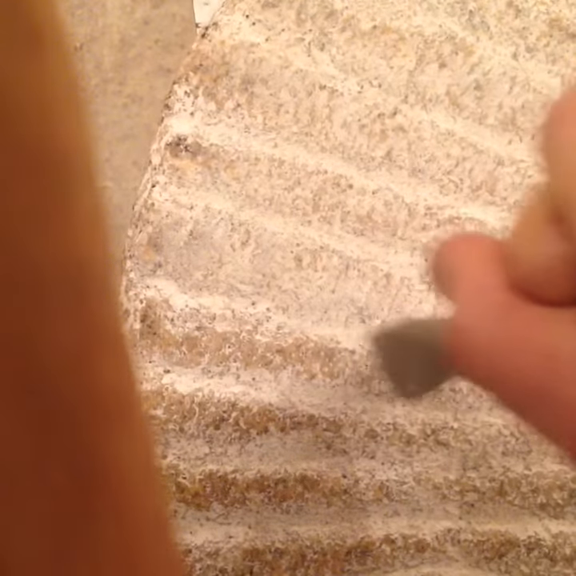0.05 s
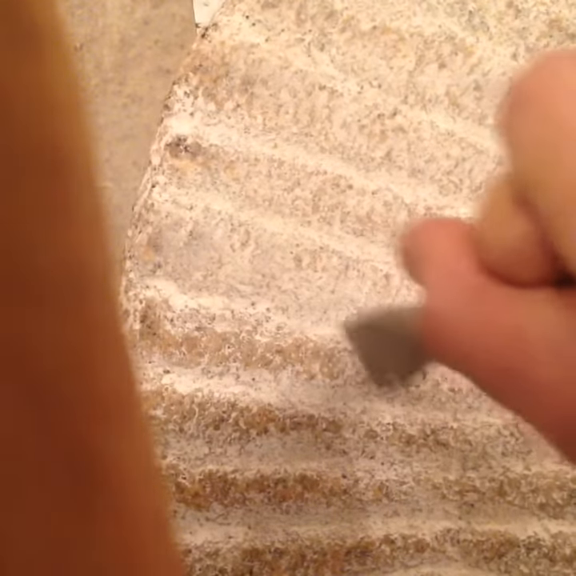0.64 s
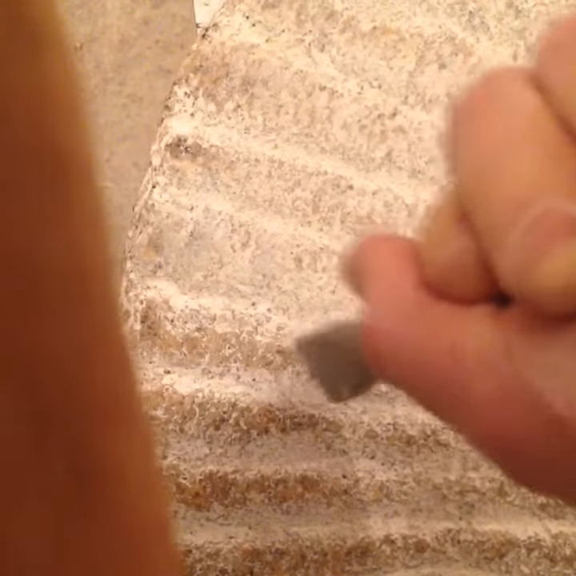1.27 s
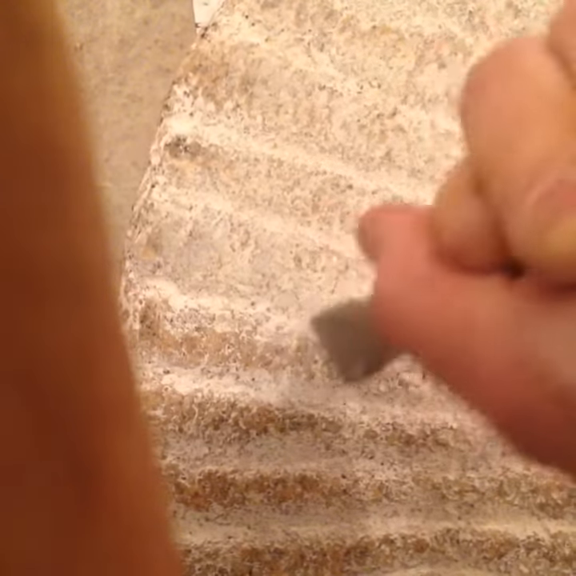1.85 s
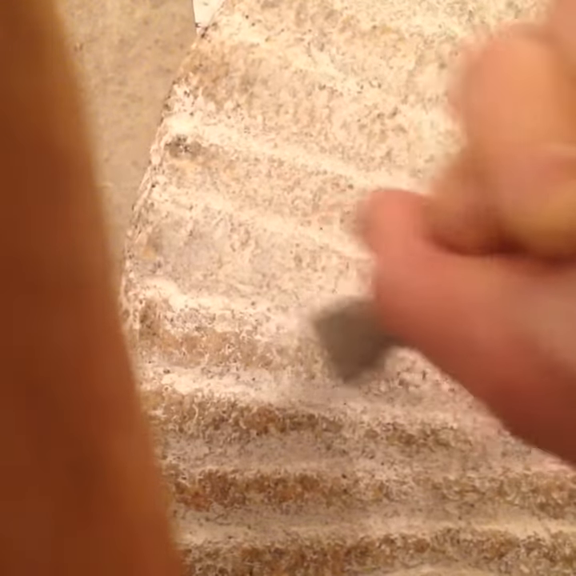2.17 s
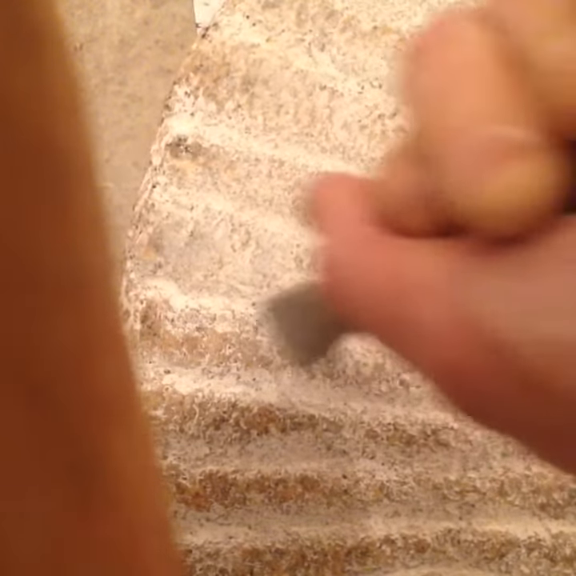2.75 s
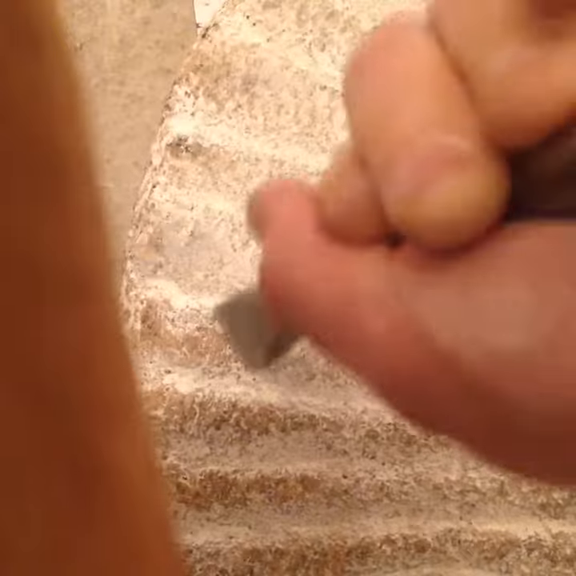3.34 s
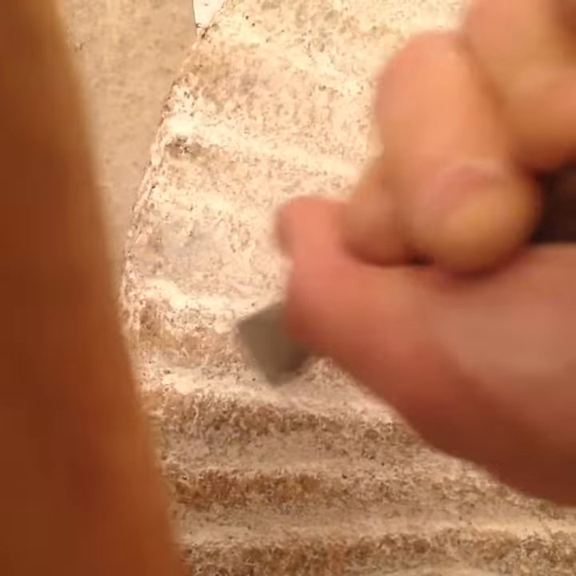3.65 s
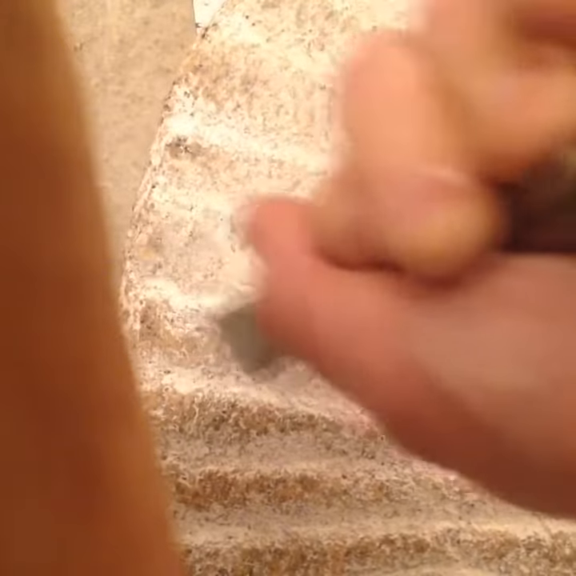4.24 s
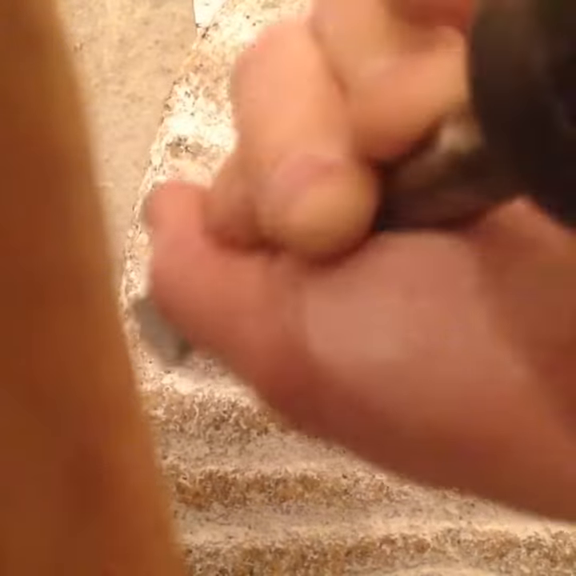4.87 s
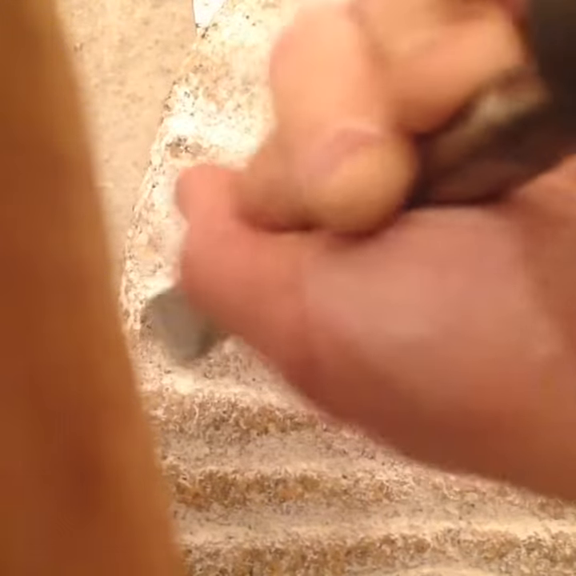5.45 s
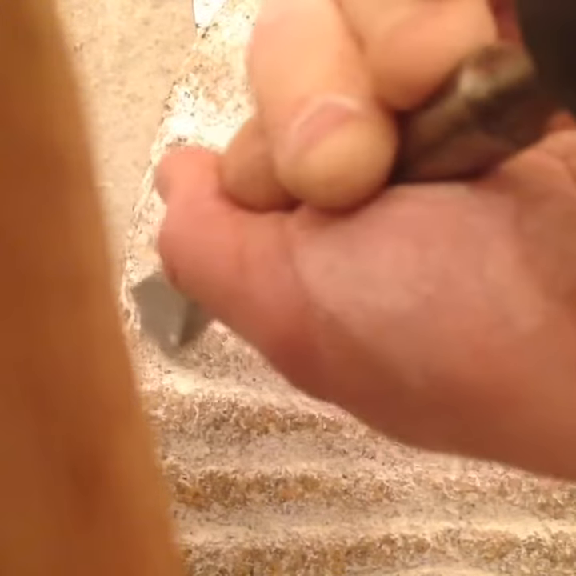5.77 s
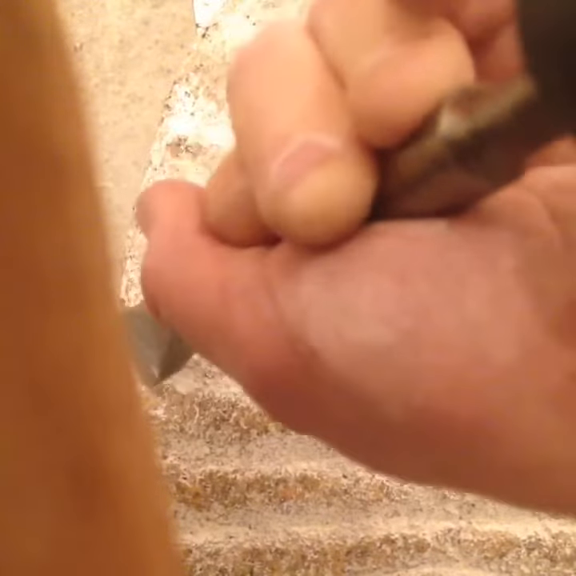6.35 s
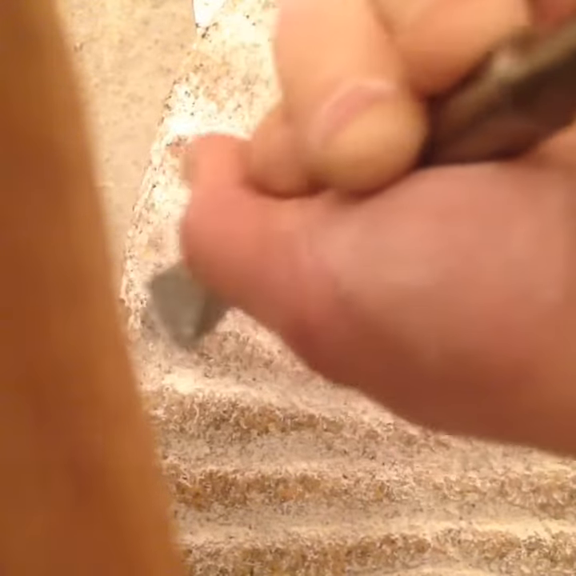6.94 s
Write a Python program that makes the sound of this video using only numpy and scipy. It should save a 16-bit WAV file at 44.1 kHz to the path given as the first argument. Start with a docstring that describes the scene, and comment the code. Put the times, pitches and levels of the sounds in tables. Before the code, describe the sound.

Close by in a small workshop, a hand-held air hammer drives a steel chisel along a millstone. The very fast blows merge into a rattling buzz, with knocking stone, crunching grit, a thin metallic ring and pulsing air. Late on, the tool hisses and drones more, then the pressure eases and the chisel pecks unevenly. A faint hum and rumble lie underneath.

```python
"""A small workshop, close by: a hand-held air hammer drives a chisel along the furrows of a millstone.
The piston strikes about 40 times a second with a clack: the stone knocks, its grains crunch and chip
under the edge, the steel rings. Between blows the chisel rattles and the piston returns with a puff of
air. Late on the barrel comes close, droning and hissing; then the hand eases off and the chisel pecks.
A faint hum and rumble lie underneath."""
import sys
import numpy as np
from scipy import signal
from scipy.fft import rfft, irfft
from scipy.io import wavfile
from scipy.ndimage import uniform_filter1d

SR = 44100
rng = np.random.default_rng(int(sys.argv[2]) if len(sys.argv) > 2 else 0)


def waveform_to_disk(signal):
    """Save audio, clipped to [-1, 1], as 16-bit WAV at the path in sys.argv[1]."""
    frames = np.transpose(np.atleast_2d(signal))
    scaled = np.clip(frames, -1, 1) * 32767
    samples = np.round(scaled).astype(np.int16)
    wavfile.write(sys.argv[1], SR, samples)


N = 313110
TIME = np.arange(N) / SR
RETURN_S = .0182   # blow to piston return
ROCK_PER_S, SHIFT_PER_S = 9.9, 40   # edge rocks in the furrow; contact shifts
BEND_HZ, TIP_HZ = 1863, 12436   # strongest shank and tip modes


def from_db(db):
    """Decibels to gain."""
    return 10 ** (np.asarray(db) / 20)


def unit_rms(x):
    """Scale to unit rms."""
    return x / np.sqrt(np.mean(x ** 2) + 1e-20)


def chance(shape, low=-2, high=2):
    """Clipped normal draws."""
    return np.clip(rng.standard_normal(shape), low, high)


def drift(per_s):
    """Random curve, spread about 1."""
    return np.interp(TIME * per_s, np.arange(512), chance(512))


def in_time(rows):
    """Each column of a time table at every sample."""
    s, *columns = np.transpose(rows)
    return [np.interp(TIME, s, c) for c in columns]


def at_hz(points, hz):
    """Interpolate on a log-frequency axis."""
    f, value = np.transpose(points)
    return np.interp(np.log(hz + 1e-3), np.log(f), value)


def colour(x, spectrum, size=8192):
    """Minimum-phase filter, rolling off below the spectrum's first point."""
    hz = np.fft.rfftfreq(size, 1 / SR)
    gain = from_db(at_hz(spectrum, hz)) * np.clip(hz / spectrum[0][0], 1e-2, 1)
    cepstrum = irfft(np.log(gain))
    cepstrum[1:size // 2] *= 2
    cepstrum[size // 2 + 1:] = 0
    return signal.fftconvolve(x, irfft(np.exp(rfft(cepstrum))))[:N]


def bandpass(x, low_hz, high_hz):
    """Butterworth band-pass."""
    return signal.sosfilt(signal.butter(2, [low_hz, high_hz], "band", fs=SR, output="sos"), x)


def clicks(times, sizes):
    """One impulse at each time."""
    inside = (times >= 0) & (times < (N - 1) / SR)
    return np.bincount(np.round(times[inside] * SR).astype(int), sizes[inside], N)


def swell(hits, rise_s, fall_s):
    """Rise-and-decay envelope after each impulse."""
    t = np.arange(2048) / SR
    return np.abs(signal.fftconvolve(hits, (1 - np.exp(-t / rise_s)) * np.exp(-t / fall_s))[:N])


def ring(x, hz, t60_s):
    """One decaying mode; its pitch may move."""
    turn = np.exp(2j * np.pi * np.cumsum(hz * np.ones(N)) / SR)
    pole = from_db(-60 / (t60_s * SR))
    return np.imag(turn * signal.lfilter([1], [1, -pole], x / turn + 1e-18))


def grainy_noise(spread_db):
    """Noise with a random gain on every sample."""
    return unit_rms(rng.standard_normal(N) * from_db(spread_db * chance(N)))


def bursts(times, spread_db, rise_s, fall_s):
    """Noise bursts of random strength."""
    sizes = from_db(spread_db * chance(len(times), high=1))
    return unit_rms(swell(clicks(times, sizes), rise_s, fall_s) * rng.standard_normal(N))


def clatter(times, sizes, spectrum, fall_s, shade_db):
    """Noise bursts of random colour; low bands last longer."""
    edges_hz = [80, 620, 1050, 1450, 2050, 3100, 4400, 6600, 10000, 13200, 20000]
    out = 0
    for low, high in zip(edges_hz, edges_hz[1:]):
        shade = from_db(shade_db * chance(len(times), -1.7, 1.7))
        power = swell(clicks(times, (sizes * shade) ** 2), .0001, fall_s * (1500 / high) ** .15)
        out = out + bandpass(unit_rms(np.sqrt(power)) * rng.standard_normal(N), low, high)
    return unit_rms(colour(out, spectrum))


# piston speed: (time [s], rate [blows/s])
BLOW_RATE = [(0.0, 39.295), (0.5, 39.613), (2.4, 39.578), (2.8, 39.758), (4.0, 39.715), (4.8, 39.974),
             (6.0, 39.562), (6.25, 39.611), (6.45, 38.309), (7.1, 38.706)]


def piston_cycles():
    """Running cycle count; the piston is steady under load and sags as the hand eases off."""
    return np.cumsum(in_time(BLOW_RATE)[0]) / SR


# deep bites and late uneven blows, relative: (time [s], crunch [dB], knock [dB], splinter [dB])
ACCENTS = [(0.006, 5.5, -7.0, -8.0), (0.158, 3.5, -3.5, -1.5), (0.184, 6.0, -7.0, 0.0),
           (0.26, 4.0, -1.5, -1.0), (0.285, 3.5, -0.5, -3.0), (0.588, 5.0, -7.0, -2.5),
           (0.664, 4.5, -3.5, -1.5), (0.689, 3.5, 2.0, -2.5), (0.79, 4.5, -7.0, -3.0),
           (0.891, 8.0, -7.0, -3.0), (0.917, 2.5, -1.5, 0.5), (1.245, 0.5, 4.5, 3.0),
           (1.321, 4.5, 4.0, -2.5), (1.346, 1.5, -2.0, 5.0), (1.371, 2.5, 3.5, 2.5),
           (1.422, 5.0, 2.0, -8.0), (1.447, 7.0, -7.0, -2.5), (1.573, 2.0, 1.0, 0.0),
           (1.674, 3.0, -1.5, -1.0), (1.775, 7.0, -7.0, -0.5), (1.8, 3.5, -3.0, 0.5),
           (1.901, 4.5, -7.0, -7.5), (2.028, 3.5, 2.0, -3.0), (2.205, 3.0, 3.0, -1.0),
           (2.331, 4.0, -7.0, -1.0), (2.457, 2.5, 4.5, -3.5), (2.659, 6.0, 0.0, -2.5),
           (2.81, 2.5, 1.0, 4.5), (2.911, 3.0, 4.0, -2.0), (3.036, 5.5, -7.0, -2.5),
           (3.137, 4.0, -7.0, -1.5), (3.238, 6.0, 2.0, -4.0), (3.464, 0.5, 2.0, 3.0),
           (3.489, 4.0, -1.0, -3.5), (3.565, 4.0, 4.0, 2.0), (3.842, 2.0, 0.0, 1.5),
           (3.942, 2.5, -2.5, 3.5), (3.968, 4.0, 2.5, 0.5), (3.993, 6.5, 3.0, -2.5),
           (4.043, -1.5, 3.0, 7.0), (4.32, 0.5, 4.0, 1.5), (4.395, 4.5, -1.0, -2.0), (4.42, 3.0, 1.5, -1.5),
           (4.546, 1.5, 1.5, 0.0), (4.746, 4.0, -4.0, -3.0), (4.771, 0.0, 2.5, 5.5),
           (4.921, 2.0, -1.0, 0.0), (4.971, 5.5, -7.0, -5.0), (4.996, 8.0, -2.5, -7.0),
           (5.021, 5.0, -4.0, -0.5), (5.398, 5.0, 2.5, -4.5), (5.448, 1.5, 0.5, 1.0),
           (5.473, 2.5, 2.5, -2.0), (5.624, 3.5, 0.5, -4.0), (5.801, 0.0, 3.0, 4.5),
           (5.978, 4.0, 0.5, -3.0), (6.054, 6.0, -2.0, -6.0), (6.104, 2.5, 4.0, 2.0),
           (6.155, 1.0, 3.5, 3.5), (6.205, 4.0, -2.5, -3.5), (6.357, -0.5, 1.0, -2.5),
           (6.383, 2.5, -2.5, -1.5), (6.409, -4.5, -0.5, 5.5), (6.435, -4.5, -6.0, 4.0),
           (6.461, -3.0, -3.5, -3.0), (6.487, -7.5, -3.0, 4.0), (6.513, 4.0, -7.0, -8.0),
           (6.539, 1.0, -7.0, -7.5), (6.565, 1.5, -7.0, -8.0), (6.591, 3.5, -0.5, -7.0),
           (6.617, -3.0, 3.5, 7.0), (6.643, -7.5, -7.0, 2.5), (6.669, 3.0, -7.0, -8.0),
           (6.695, -7.0, -2.5, 1.0), (6.721, -3.0, 0.0, 1.0), (6.747, -3.5, 3.0, 7.0),
           (6.773, -1.0, 1.5, 2.0), (6.799, 0.0, 2.0, -1.0), (6.825, -7.0, -1.0, 6.0),
           (6.851, 2.5, 0.5, 2.0), (6.877, 2.5, 4.0, 7.0), (6.903, -5.0, 0.5, 4.0),
           (6.929, 0.5, -5.5, -0.5), (6.955, -2.5, 1.5, -3.0), (6.981, -0.5, 0.0, 1.5),
           (7.007, 0.0, -1.5, 1.0), (7.033, -1.0, 2.0, -5.5), (7.059, -4.5, -0.5, 7.0)]


def piston(first_s=.0057, jitter_s=.00014):
    """Blow times with crunch, knock and splinter gains, random except at the accents."""
    cycles = piston_cycles()
    times = np.interp(np.arange(int(cycles[-1]) + 1), cycles, TIME) + first_s
    scatter = chance((len(times), 4), -2.2, 1.2)
    usual_db, spread_db = np.array([-1, -.4, 0]), np.array([2.6, 1.6, 3.2])
    db = usual_db + spread_db * scatter[:, :3]
    for s, *accent_db in ACCENTS:
        db[np.argmin(np.abs(times - s))] = accent_db
    return times + jitter_s * scatter[:, 3], *from_db(db.T)


# piston on steel: (frequency [Hz], gain [dB])
STRIKE_SPECTRUM = [(220, -11), (600, -7.5), (900, -3), (1200, -2.5), (1600, 0), (2300, -9), (3000, -14),
                   (3900, -17), (4900, -18), (6000, -23), (7900, -24), (10000, -34), (12500, -26),
                   (15000, -26)]


def strike(times, sizes, lead_s=.0006):
    """Piston meets steel: a hard clack just ahead of the crunch."""
    hits = clicks(times - lead_s, sizes)
    scuff = unit_rms(swell(hits, rise_s=.0001, fall_s=.001) * rng.standard_normal(N))
    return unit_rms(colour(unit_rms(hits) + 1.8 * scuff, STRIKE_SPECTRUM))


# tool and stone body: (frequency [Hz], gain [dB])
KNOCK_SPECTRUM = [(200, -24), (400, -14), (520, -6), (555, -5.5), (620, -10), (675, -1.2), (715, -1),
                  (755, 1.7), (835, 1.6), (875, 2.2), (920, -1), (1020, -7), (1250, -20), (1700, -29),
                  (3000, -55)]


def knock(times, force, press, lead_s=.0006, return_db=-8):
    """Tool and stone answer every blow alike; the piston's return knocks more softly."""
    return_times = times + RETURN_S + .00021 * rng.standard_normal(len(times))
    blows = clicks(times - lead_s, force)
    returns = from_db(return_db) * press * clicks(return_times - lead_s, force)
    return unit_rms(colour(blows + returns, KNOCK_SPECTRUM))


def cracks(times, bite, press, count=5, lead_s=.0009):
    """Times and sizes of grain cracks; more pressure and a deeper bite prolong the breaking."""
    stretch = (.2 + .9 * np.interp(times, TIME, press)) * bite ** .25
    delay_s = rng.gamma(5, .00043, (len(times), count)) * stretch[:, None] - lead_s
    sizes = np.exp(-delay_s / .057)
    sizes *= bite[:, None] / np.linalg.norm(sizes, axis=1, keepdims=True)   # share the blow's energy
    return (times[:, None] + delay_s).ravel(), sizes.ravel()


# breaking grains: (frequency [Hz], gain [dB])
CRUNCH_SPECTRUM = [(100, -19), (250, -7), (480, -5.5), (780, 4), (1100, 0.5), (1600, 5), (2100, -7),
                   (2900, -1.5), (3300, -20), (4900, -13), (6800, -23.5), (10200, -35), (13000, -20),
                   (15200, -33)]


def crunch(crack_times, crack_sizes):
    """Grains break under the edge, one burst per crack."""
    return clatter(crack_times, crack_sizes, CRUNCH_SPECTRUM, fall_s=.0015, shade_db=3.8)


def splinter(x, times, gains, above_hz=2150):
    """Treble gain per blow: splitting hard grains is bright, crushing loose grit is dull."""
    treble = signal.sosfiltfilt(signal.butter(2, above_hz, "high", fs=SR, output="sos"), x)
    blow = np.clip(np.searchsorted(times, TIME + .003) - 1, 0, None)
    return x + (uniform_filter1d(gains[blow], size=64) - 1) * treble


# flat landings: (time [s], level [dB])
PECK_HITS = [(1.9044, -0.0), (6.3583, -0.1), (6.4363, -1.4), (6.4876, -5.6), (6.5142, -0.6), (6.54, -2.6),
             (6.5659, -2.2), (6.6702, -0.2), (6.7221, -1.6), (6.7995, -1.1), (6.9552, -2.4), (7.0337, -1.1)]
# one landing: (frequency [Hz], gain [dB])
PECK_SPECTRUM = [(400, -17), (900, -7), (1600, 0), (2200, -9), (3300, -25), (5000, -22), (9000, -36)]


def pecks(peak_db=.3, lead_s=.0006):
    """The bouncing chisel lands flat on the stone: short, dull knocks."""
    s, db = np.transpose(PECK_HITS)
    knocks = colour(clicks(s - lead_s, from_db(db)), PECK_SPECTRUM)
    return from_db(peak_db) * knocks / np.abs(knocks).max()


# chisel shank: (frequency [Hz], level [dB], t60 [s], wander [Hz])
SHANK_MODES = [(BEND_HZ, 0, 0.047, 8), (2930, -6, 0.016, 70), (7900, -20.5, 0.018, 110)]


def shank_ring(crack_times, crack_sizes, spread_db=4.5):
    """Each crack rings the steel's modes unequally; their pitch wanders as the contact shifts."""
    strengths = from_db(spread_db * chance((len(crack_times), len(SHANK_MODES)), high=1.5))
    out = 0
    for (hz, db, t60_s, wander_hz), strength in zip(SHANK_MODES, strengths.T):
        drive = clicks(crack_times, crack_sizes * strength)
        out = out + from_db(db) * unit_rms(ring(drive, hz + wander_hz * drift(SHIFT_PER_S), t60_s))
    return unit_rms(out)


# chisel tip: (frequency [Hz], level [dB], t60 [s], wander [Hz])
TIP_MODES = [(12150, -7, .014, 130), (TIP_HZ, 0, .04, 28), (12620, -6, .018, 120),
             (13400, -13.5, .012, 170)]


def tip_ring(times, bite, waver_db=.8):
    """Each blow taps and scrapes the tip's high modes; balance and pitch shift as the edge rocks."""
    taps = .28 * unit_rms(clicks(times - .0002, np.sqrt(bite)))
    out = 0
    for hz, db, t60_s, wander_hz in TIP_MODES:
        scrape = bursts(times - .0007, spread_db=2.1, rise_s=.0007, fall_s=.0021)
        gain = from_db(db + waver_db * drift(ROCK_PER_S))
        out = out + gain * unit_rms(ring(taps + scrape, hz + wander_hz * drift(SHIFT_PER_S), t60_s))
    return unit_rms(out)


# flying chips: (frequency [Hz], gain [dB])
CHIP_SPECTRUM = [(1200, -12), (2500, 2), (3300, -3), (4900, -2), (6200, -6), (7200, -15), (10000, -24),
                 (15000, -26)]


def chips(times, bite, count=4, spread_db=5):
    """Loosened grains snap off and skitter for some milliseconds after each blow."""
    delay_s = rng.gamma(3, .0023, (len(times), count))
    sizes = np.sqrt(bite)[:, None] * from_db(spread_db * chance(delay_s.shape, high=1.5))
    chip_times = times[:, None] + delay_s
    return clatter(chip_times.ravel(), sizes.ravel(), CHIP_SPECTRUM, fall_s=.0006, shade_db=4.5)


# steel on grit: (frequency [Hz], gain [dB])
GRATE_SPECTRUM = [(8000, -41.5), (11000, -18), (12400, -13), (13200, 9.5), (14200, -5), (15200, -20.5)]


def grate(times, waver_db=1.9):
    """The edge grates on broken grains, wavering as it rocks."""
    scrapes = bursts(times - .0004, spread_db=4.5, rise_s=.0012, fall_s=.0024)
    return from_db(waver_db * drift(ROCK_PER_S)) * unit_rms(colour(scrapes, GRATE_SPECTRUM))


# exhaust ports: (delay after blow [s], level [dB])
EXHAUST_PORTS = [(.0132, 0), (.0175, -1)]
# exhaust air: (frequency [Hz], gain [dB])
EXHAUST_SPECTRUM = [(150, -2.5), (400, 1.5), (830, 17), (1150, 6.5), (1600, 3.5), (2400, -11), (3300, -6),
                    (4000, -4.5), (4900, -2), (5500, -15), (6100, -3), (7200, -20), (9000, -20),
                    (15000, -22)]


def exhaust(times, press, open_s=.001, close_s=.0045, leak=.18, jitter_s=.00044, spread_db=2.1):
    """Air leaks all the time and swells as the returning piston uncovers each port."""
    blow = np.clip(np.searchsorted(times, TIME) - 1, 0, None)
    power = leak ** 2
    for port_s, port_db in EXHAUST_PORTS:
        timing, strength = chance((len(times), 2))[blow].T
        late_s = TIME - times[blow] - port_s - jitter_s * timing
        opening = np.exp(np.minimum(late_s / open_s, -late_s / close_s))
        power = power + (press * opening * from_db(port_db + spread_db * strength)) ** 2
    return unit_rms(colour(np.sqrt(power) * grainy_noise(spread_db=3), EXHAUST_SPECTRUM))


# chisel in its sleeve: (frequency [Hz], gain [dB])
RATTLE_SPECTRUM = [(200, -11), (500, -5), (800, -4), (1150, -5), (1600, -4.5), (2400, -5), (4000, -22)]


def rattle(times, count=12, pitches=14, spread_db=4):
    """The loose chisel chatters in its sleeve, most as the piston turns and just before it strikes."""
    delay_s = rng.uniform(.004, .025, (len(times), count))
    at_turn = .6 * np.exp(-((delay_s - RETURN_S) / .003) ** 2)
    before_blow = 1.1 * np.exp(-((delay_s - .0225) / .003) ** 2)
    sizes = (1 + at_turn + before_blow) * from_db(spread_db * chance(delay_s.shape, high=1.6))
    touch_times = times[:, None] + delay_s
    pitch = rng.integers(0, pitches, delay_s.shape)
    out = 0
    for k, hz in enumerate(np.geomspace(660, 2600, pitches)):
        touches = clicks(touch_times[pitch == k], sizes[pitch == k])
        out = out + np.sqrt(hz) * unit_rms(ring(touches, hz, t60_s=.011 * (3000 / hz) ** .4))
    return unit_rms(colour(out, RATTLE_SPECTRUM))


# air at the opening port: (frequency [Hz], gain [dB])
SPIT_SPECTRUM = [(400, 0.5), (1200, 10), (2400, 7), (3200, 1), (3900, 0), (4900, 2), (6100, -2.5),
                 (7200, -10), (7900, -4), (8600, -13), (10000, -20), (15000, -21.5)]


def port_spit(times, delay_s=.0164):
    """A sharp spit of air as the port opens."""
    spits = bursts(times + delay_s, spread_db=4.5, rise_s=.00035, fall_s=.0019)
    return unit_rms(colour(spits, SPIT_SPECTRUM))


# air leak at the shank: (frequency [Hz], gain [dB])
LEAK_SPECTRUM = [(3300, -7), (4900, 5), (6200, 3), (7200, -1), (8000, 5), (10000, -3), (12000, 2),
                 (15000, -10)]


def barrel(times, press, near_s=5.23, approach_s=.26):
    """The barrel comes close: it drones with both piston strokes, and blows spurt air past the shank."""
    nearness = .5 + .5 * np.tanh((TIME - near_s) / approach_s)
    strokes = 2 * piston_cycles()
    drone = from_db(-49) * np.sqrt(2 * press) * np.sin(2 * np.pi * strokes)
    spurts = swell(clicks(times - .0008, np.ones(len(times))), rise_s=.0003, fall_s=.0035)
    flow = unit_rms(1 + 2 * unit_rms(spurts))
    hiss = unit_rms(colour(grainy_noise(spread_db=6), LEAK_SPECTRUM))
    return nearness * (drone + from_db(-35.3) * press ** .25 * flow * hiss)


def flutter(times, force, roughness=.68):
    """The pulsing air adds a low, ragged burr."""
    # (frequency [Hz], gain [dB])
    spectrum = [(70, -18), (120, -24), (158, 2), (200, 2), (240, 3), (290, -13), (450, -15), (1000, -35)]
    pulses = unit_rms(clicks(times, force)) + roughness * rng.standard_normal(N)
    return unit_rms(colour(pulses, spectrum))


# workshop decay: (frequency [Hz], t60 [s])
ROOM_T60 = [(100, 1), (800, 0.97), (3000, 0.13), (12000, 0.15)]


def workshop(x, wet_db=-15.5, onset_s=.0035, size=16384):
    """A short diffuse tail whose treble dies first."""
    t = np.arange(size) / SR
    edges_hz = np.geomspace(70, 16000, 8)
    tail = 0
    for low, high in zip(edges_hz, edges_hz[1:]):
        t60_s = at_hz(ROOM_T60, np.sqrt(low * high))
        tail = tail + bandpass(rng.standard_normal(size), low, high) * from_db(-60 * t / t60_s)
    tail *= np.clip(t / onset_s, 0, 1)
    return from_db(wet_db) * signal.fftconvolve(x, tail / np.linalg.norm(tail))[:N]


# background rumble: (frequency [Hz], gain [dB])
RUMBLE_SPECTRUM = [(20, -5), (50, 8.5), (100, -1), (200, -4), (500, -23)]


def background(hum_hz=137.7, hum_db=-51, rumble_db=-51.5):
    """A steady hum over a wavering rumble."""
    hum = from_db(hum_db) * np.sqrt(2) * np.sin(2 * np.pi * hum_hz * TIME)
    rumble_gain = from_db(rumble_db + 2 * drift(per_s=9))
    return hum + rumble_gain * unit_rms(colour(rng.standard_normal(N), RUMBLE_SPECTRUM))


# edge along the furrow, relative: (time [s], knock [dB], crunch [dB], tip ring [dB], splinter [dB])
FURROW_LEVELS = [(0, -13, -14, -27, 1), (.25, -13.5, -13.5, -25.5, 1), (.5, -14, -17, -27, 1.5),
                 (1.1, -15, -18.5, -28, 1.5), (1.5, -12, -15.5, -28, 1.5), (1.85, -14, -15.5, -29.5, 1.5),
                 (2.05, -15.5, -17.5, -28, 1.5), (2.55, -16, -18, -25, 1), (2.75, -13.5, -18, -25.5, 1),
                 (3.85, -14, -17.5, -24.5, 0), (4.3, -14, -17, -26.5, -0.5), (4.98, -13.5, -15, -25.5, 1.5),
                 (5.2, -15.5, -18.5, -29.5, 3), (5.75, -15, -19.5, -38, 4.5), (6.2, -14, -17, -33, 4),
                 (6.45, -18.5, -19.5, -38, 1.5), (6.85, -19, -18.5, -35, 1), (7.1, -17, -17, -32, 1)]
# tool air, relative: (time [s], exhaust [dB], flutter [dB])
AIR_LEVELS = [(0, -29.5, -28), (4.6, -30.5, -29), (5.05, -31, -24.5), (5.65, -29, -28), (6, -29, -22.5),
              (6.5, -30, -35.5), (7.1, -30.5, -26.5)]
# hand on the chisel: (time [s], pressure [0-1])
HAND_PRESSURE = [(0, 0.74), (6.25, 0.73), (6.45, 0.21), (6.7, 0.02), (6.85, 0.7), (7.1, 0.22)]


def scene():
    """Stone, steel and air follow the piston, over the workshop's background; mono."""
    knock_db, crunch_db, tip_db, splinter_db = in_time(FURROW_LEVELS)
    air_db, flutter_db = in_time(AIR_LEVELS)
    press = np.clip(in_time(HAND_PRESSURE)[0], .05, 1)
    contact = np.sqrt(press)
    times, bite, force, brightness = piston()
    brightness *= from_db(np.interp(times, TIME, splinter_db))
    crack_times, crack_sizes = cracks(times, bite, press)

    stone = from_db(knock_db - 5.1) * contact * knock(times, force, press)
    grit = from_db(crunch_db - 4) * crunch(crack_times, crack_sizes)
    clack = from_db(.3 * crunch_db - 20.5) * strike(times, np.sqrt(bite * force))
    flakes = from_db(crunch_db - 18.5) * contact * chips(times, bite)
    shank = from_db(crunch_db - 10.5) * contact * shank_ring(crack_times, crack_sizes)
    edge = from_db(.5 * tip_db - 23.5) * grate(times)
    tip = from_db(tip_db - 4) * tip_ring(times, bite)
    sleeve = from_db(air_db + 3.6) * rattle(times)
    air = from_db(air_db + 6.5) * exhaust(times, press)
    spit = from_db(air_db - 3) * port_spit(times)
    burr = from_db(flutter_db - 10.7) * flutter(times, force)

    cutting = splinter(clack + grit + shank + flakes, times, brightness)
    tool = cutting + pecks() + tip + edge + sleeve + air + spit
    room = background() + workshop(tool + 1.02 * stone)
    return (stone + tool + burr + barrel(times, press) + room)[None]


def record(dry):
    """Soft peak limiting, then a steep low-pass."""
    ceiling, cutoff_hz = .9, 15100
    rounded = dry / (1 + (dry / ceiling) ** 4) ** (1 / 4)
    return signal.sosfilt(signal.ellip(10, .2, 80, cutoff_hz, fs=SR, output="sos"), rounded)


dry = scene()
out = record(dry)
waveform_to_disk(out)
```